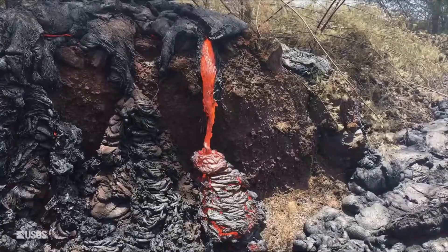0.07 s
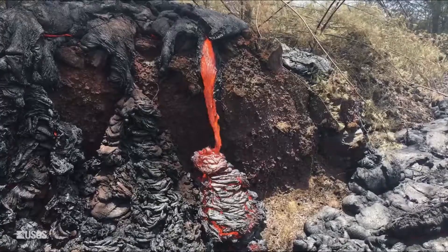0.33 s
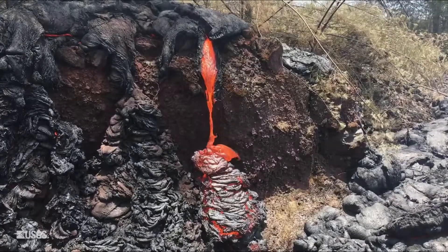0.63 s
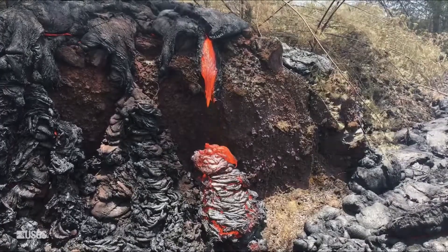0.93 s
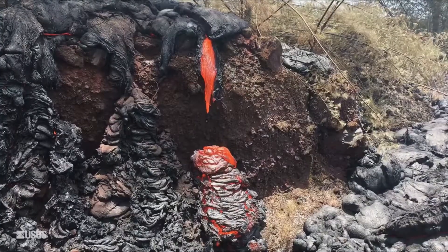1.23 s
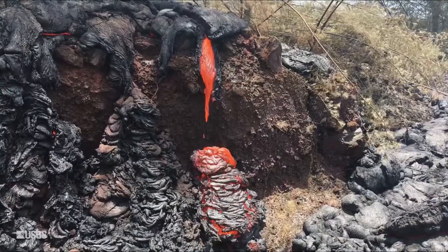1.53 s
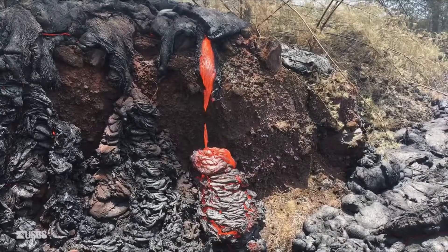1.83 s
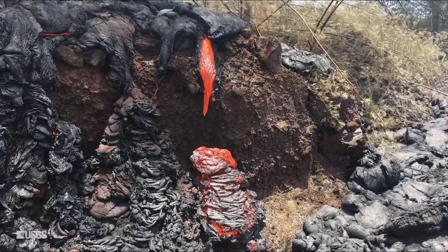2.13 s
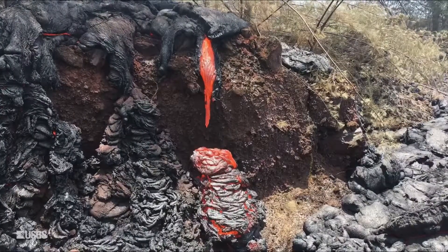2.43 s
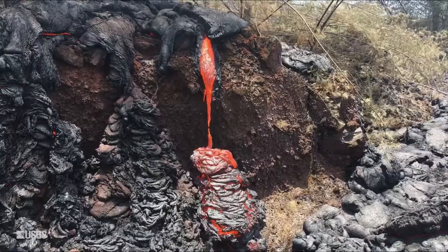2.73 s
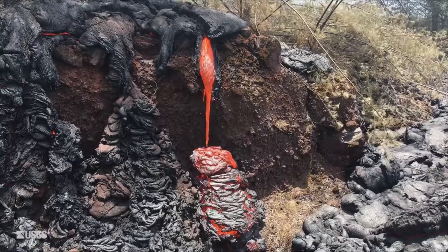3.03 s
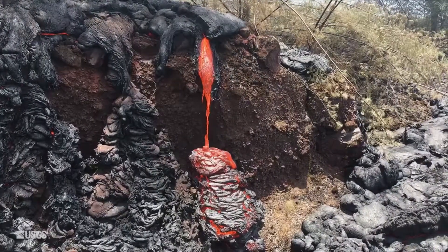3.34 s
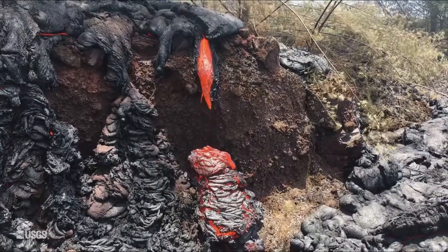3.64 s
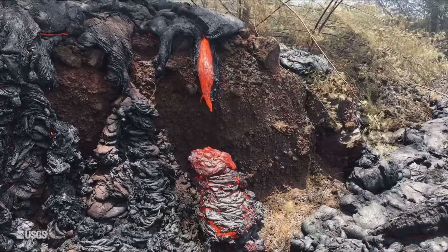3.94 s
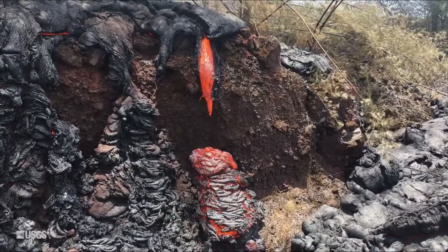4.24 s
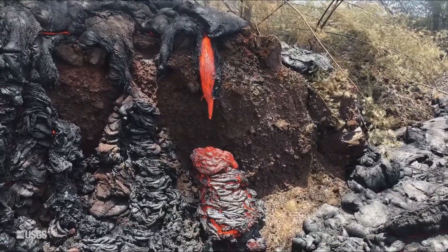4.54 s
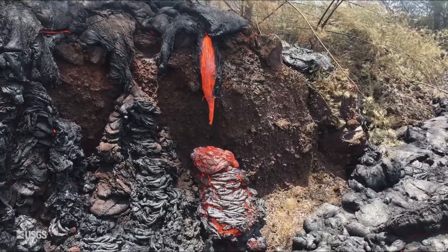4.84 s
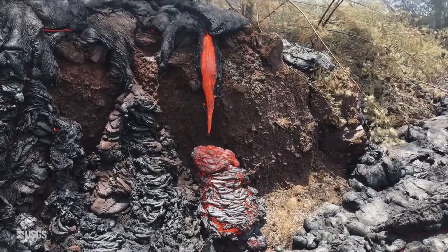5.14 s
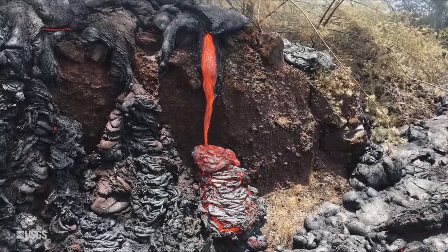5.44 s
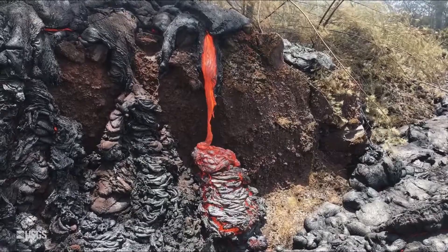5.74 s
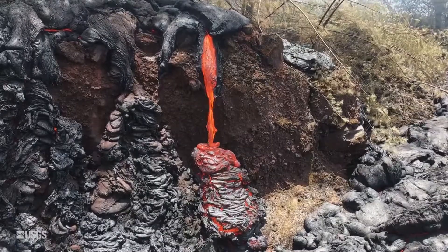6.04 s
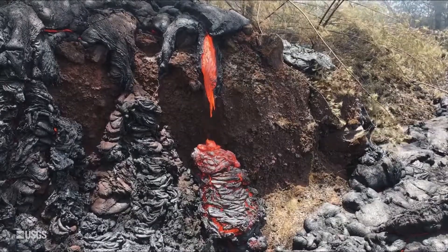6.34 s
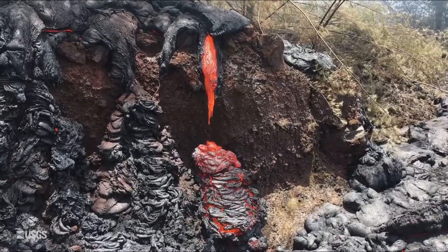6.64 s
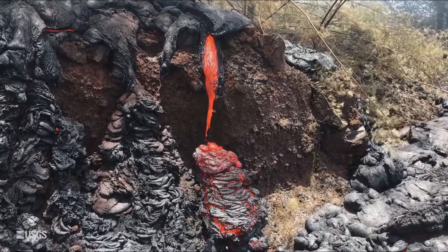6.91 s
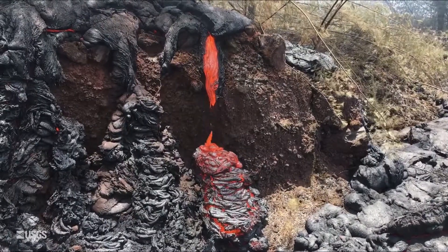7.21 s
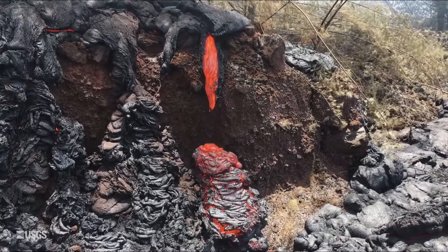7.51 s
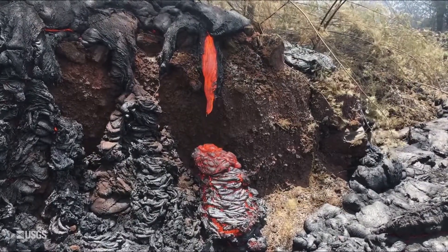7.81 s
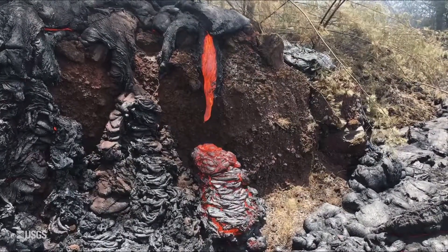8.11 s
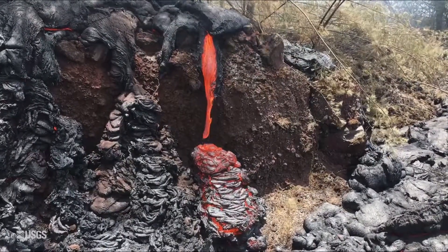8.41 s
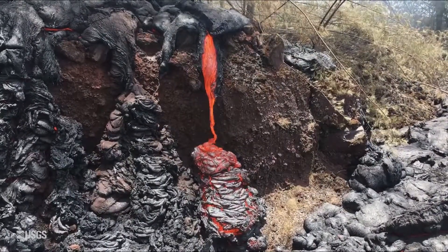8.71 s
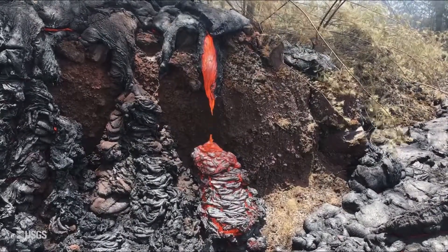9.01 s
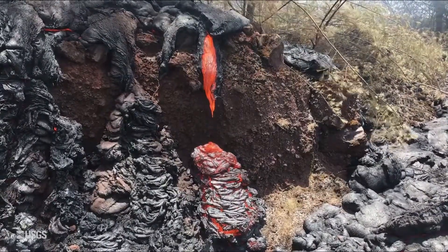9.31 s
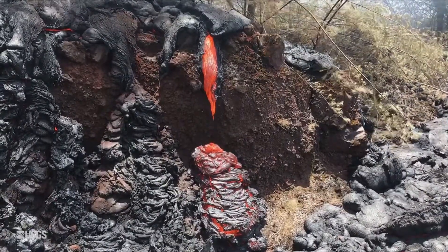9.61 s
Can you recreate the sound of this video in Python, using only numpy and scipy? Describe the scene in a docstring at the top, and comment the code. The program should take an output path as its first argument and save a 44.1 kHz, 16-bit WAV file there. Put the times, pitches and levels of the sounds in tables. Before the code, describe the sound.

Cooling lava ticks and crackles faintly over a low hiss, while wind rumbles and later buffets the microphone in hard gusts.

```python
"""Ticks, pops and flurries of tiny flakes come from the glassy crust of lava dribbling over a ledge.
The crust cracks as it cools, and each brittle fracture rings as a short damped oscillation.
Behind it lie a low steady hiss and a blurred chorus of far birds. Turbulent wind rumbles on the
microphone and in the second half buffets it in hard gusts."""
import sys
import numpy as np
from scipy import signal
from scipy.fft import rfft, irfft, next_fast_len
from scipy.io import wavfile
from scipy.ndimage import uniform_filter1d

SR = 44100
rng = np.random.default_rng(int(sys.argv[2]) if len(sys.argv) > 2 else 0)


def unload_audio(sound):
    """Save the sound as a 16-bit wav file, at the path given as the first command line argument."""
    columns = np.transpose(np.atleast_2d(sound))
    # keep every value between -1 and 1, then stretch to whole-number steps
    steps = np.round(np.clip(columns, -1, 1) * 32767)
    wavfile.write(sys.argv[1], SR, steps.astype(np.int16))


N = 426006
T = np.arange(N) / SR


def undb(db):
    """Amplitude ratio of a level in decibels."""
    return 10 ** (np.asarray(db) / 20)


def unit(x):
    """Normalisation to rms 1."""
    return x / np.sqrt(np.mean(x ** 2) + 1e-20)


def steady(x, samples):
    """Envelope flattening: division by the running rms."""
    return x / np.sqrt(uniform_filter1d(x ** 2, size=samples) + 1e-12)


def curve(rows, at):
    """Linear interpolation through (x, y) rows."""
    return np.interp(at, *np.transpose(rows))


def colour(x, spectrum):
    """Spectral shaping by (frequency_hz, level_db) rows, rolled off below the first; rms 1."""
    hz, db = np.transpose(spectrum)
    size = next_fast_len(N, True)
    bin_hz = np.fft.rfftfreq(size, 1 / SR) + 1e-9
    gain = undb(np.interp(np.log(bin_hz), np.log(hz), db)) * np.minimum(bin_hz / hz[0], 1) ** 2
    return unit(irfft(rfft(x, size) * gain, size)[:N])


def butterworth(x, kind, edge_hz, order=2):
    """Filtering with a maximally flat passband."""
    return signal.sosfilt(signal.butter(order, edge_hz, kind, fs=SR, output="sos"), x)


def noise_band(low_hz, high_hz):
    """Band-limited Gaussian noise; rms 1."""
    return unit(butterworth(rng.standard_normal(N), "band", [low_hz, high_hz], order=4))


def wander(rate_hz):
    """Random modulation: sample-and-hold noise, smoothed twice; rms 1."""
    hold = max(int(SR / rate_hz), 2)
    steps = np.repeat(rng.standard_normal(N // hold + 1), hold)
    return unit(uniform_filter1d(uniform_filter1d(steps, hold), hold)[:N])


def swell(middle_s, length_s, edge=2.32):
    """A generalised Gaussian envelope of peak 1; edge 2 is a bell, higher has steeper flanks."""
    near = slice(max(int((middle_s - 2 * length_s) * SR), 0), int((middle_s + 2 * length_s) * SR))
    out = np.zeros(N)
    out[near] = np.exp(-np.abs(2 * (T[near] - middle_s) / length_s) ** edge)
    return out


# Spectrum of the surroundings: frequency_hz, relative_db
HISS_SPECTRUM = [(100, 6.5), (400, -1.5), (650, 2), (1000, 5.5), (1400, -0.5), (2000, -6.5), (2700, -7.5),
                 (3500, 0), (4200, -8), (4900, -17.5), (6800, -11), (7800, -24.5), (9500, -15),
                 (16000, -45)]
def hiss(level_db=-54.5, sway_db=0.3):
    """Broadband ambient noise: a smooth distant rush of nearly constant level."""
    return colour(rng.standard_normal(N), HISS_SPECTRUM) * undb(level_db + sway_db * wander(3))


# Far calls that stand out of the chorus: start_s, end_s, first_hz, last_hz, relative_db
BIRD_CALLS = [(0.95, 1.25, 5650, 5600, -82), (2.4, 2.95, 4300, 3870, -65), (2.55, 2.85, 3340, 3320, -59.5),
              (3.3, 3.9, 3390, 3320, -61), (3.3, 3.75, 3880, 4020, -62.5), (3.85, 4.25, 4090, 4120, -62),
              (5.3, 5.55, 3920, 3900, -58), (5.4, 5.8, 3620, 3560, -62), (5.42, 5.6, 3160, 3100, -58),
              (5.55, 5.85, 4600, 4580, -66), (6.3, 6.6, 3780, 3980, -64), (6.75, 7.15, 3500, 3390, -61.5),
              (7.35, 7.8, 3930, 3770, -64.5), (8.65, 9.0, 3660, 3890, -56.5), (8.75, 9.0, 6850, 6980, -69),
              (9.35, 9.66, 3560, 3600, -62)]
def birds(blur_hz=130, chorus_db=-70, gain_db=-1.0, count=64):
    """Scattering in the forest smears far, wavering calls into gliding narrowband noise."""
    chorus = []
    for when, length, pitch, glide, nearness in rng.random((count, 5)):
        start_s = when * N / SR
        end_s = start_s + 0.165 + 0.286 * length
        first_hz = 3100 + 950 * pitch
        chorus.append((start_s, end_s, first_hz, first_hz + 200 * (glide - .5), chorus_db + 7 * nearness))
    blur = wander(blur_hz) + 1j * wander(blur_hz)
    waver = 1 + .011 * wander(14)
    out = np.zeros(N)
    for start_s, end_s, first_hz, last_hz, db in list(BIRD_CALLS) + chorus:
        span = np.arange(int(start_s * SR), min(int(end_s * SR), N))
        progress = np.linspace(0, 1, len(span))
        shifted = span - rng.integers(N)  # each call has its own stretch of blur and waver
        pitch_hz = (first_hz + (last_hz - first_hz) * progress) * waver[shifted]
        phase = 2 * np.pi * np.cumsum(pitch_hz) / SR
        call = np.real(blur[shifted] * np.exp(1j * phase))
        out[span] += undb(db + gain_db) * np.sin(np.pi * progress) * call
    return out


# Mean strength of the wind at the microphone: time_s, level_db
MEAN_FLOW = [(0.0, -73), (0.45, -80), (1.3, -76.5), (1.7, -58), (2.25, -72.5), (3.0, -65), (3.22, -56),
             (4.15, -59), (5.0, -47), (5.7, -71), (5.95, -38), (6.3, -56.5), (7.1, -48), (7.4, -32),
             (8.15, -32.5), (8.45, -37), (9.05, -37.5), (9.66, -37.5)]
# Gusts that swell above the mean: middle_s, length_s, level_db, extra_bass_db
GUSTS = [(1.007, 0.07, -51, 2.5), (1.97, 0.15, -60, 5.5), (3.172, 0.055, -48, 3.5), (3.603, 0.08, -58, 3.5),
         (3.956, 0.044, -51, 5.5), (4.061, 0.062, -59, 3.5), (4.28, 0.06, -50, 1),
         (4.968, 0.14, -47.5, 2.5), (5.933, 0.19, -34.5, -8.5), (6.456, 0.088, -33, 7),
         (6.582, 0.14, -25, -6), (7.415, 0.1, -24.5, 1), (7.71, 0.07, -29, 3.5), (7.897, 0.2, -15, -1),
         (8.02, 0.061, -18, -3), (8.577, 0.2, -39, 0.5), (8.966, 0.12, -32.5, 7), (9.102, 0.082, -34, 2.5),
         (9.288, 0.067, -37.5, 4.5)]
def wind_level(puffs_per_s=13, puff_db=3):
    """Incoherent addition: the mean flow, with its puffs and lulls, and the gusts sum in power; in dB."""
    breeze_power = undb(curve(MEAN_FLOW, T) + puff_db * wander(puffs_per_s)) ** 2
    gust_power = sum(undb(db) ** 2 * swell(middle_s, length_s) for middle_s, length_s, db, _ in GUSTS)
    return 10 * np.log10(breeze_power + gust_power)


# Single eddies that hit the microphone: middle_s, length_s, level_db, corner_ratio
EDDIES = [(0.846, 0.037, -47, 1.0), (1.072, 0.011, -31.5, 0.51), (1.61, 0.019, -40.5, 0.9),
          (1.643, 0.015, -40, 0.9), (2.449, 0.013, -37, 1.2), (3.16, 0.018, -38.5, 0.63),
          (3.809, 0.019, -37, 0.33), (5.816, 0.018, -33, 1.6), (5.968, 0.017, -21.5, 0.69),
          (6.017, 0.013, -26.5, 0.69), (6.208, 0.017, -28, 0.73), (6.387, 0.036, -33, 0.89),
          (6.432, 0.0078, -19, 0.43), (6.47, 0.025, -14, 0.93), (6.522, 0.0056, -13, 0.63),
          (6.596, 0.062, -19.5, 0.87), (6.682, 0.019, -21.5, 1.01), (6.858, 0.032, -28.5, 0.54),
          (7.302, 0.008, -23.5, 0.92), (7.399, 0.028, -13.0, 1.07), (7.498, 0.016, -24.5, 1.14),
          (7.634, 0.02, -21, 1.03), (7.701, 0.016, -20.5, 0.99), (7.742, 0.022, -17.5, 1.14),
          (7.806, 0.017, -14, 1.26), (7.846, 0.025, -16.5, 1.35), (7.902, 0.049, -16, 1.35),
          (8.05, 0.0059, -11.5, 2.02), (8.063, 0.017, -16.5, 1.4), (8.198, 0.029, -15, 1.11),
          (8.272, 0.021, -26.5, 0.54), (8.476, 0.03, -24.5, 0.48), (8.54, 0.01, -23.5, 0.76),
          (8.928, 0.019, -32, 1.4), (8.707, 0.015, -26, 0.78), (8.779, 0.016, -26.5, 0.67),
          (9.006, 0.024, -20.5, 0.94), (9.291, 0.0071, -21.5, 0.88), (9.509, 0.028, -29, 0.76)]
# Corner of the turbulence spectrum against the strength of the flow: flow_db, corner_hz
CORNER_BY_FLOW = [(-74, 177), (-29.5, 324), (-30.5, 400), (-21, 627), (-15.5, 976), (15, 640)]
# Turbulence spectrum around that corner: ratio_to_corner, relative_band_db
BUFFET_SPECTRUM = [(.1, -32), (.2, -11.5), (.32, -6), (.5, -5.5), (.75, -7), (1.001, -9.5), (1.5, -15.5),
                   (2.7, -28), (4, -50.5), (6, -77)]
def buffeting(wind_db, flutter_db=3.0, churn_db=1.0, tear_db=4.5, gain_db=1.0):
    """Turbulence at the microphone port: harder flow makes smaller, faster eddies and a brighter noise."""
    # light air comes fitfully, a full blast more evenly
    depth_db = np.interp(wind_db, [-30, -20], [flutter_db, churn_db])
    power = undb(wind_db + depth_db * wander(70)) ** 2
    weighted_power = power.copy()
    for middle_s, length_s, db, corner_ratio in EDDIES:
        eddy_power = undb(db) ** 2 * swell(middle_s, length_s, edge=3.0)
        power += eddy_power
        weighted_power += corner_ratio * eddy_power
    flow_db = 10 * np.log10(power)
    corner_hz = curve(CORNER_BY_FLOW, flow_db) * weighted_power / power
    ratios, shape_db = np.transpose(BUFFET_SPECTRUM)
    turbulence = np.zeros(N)
    for hz in 170 * 2 ** (np.arange(11) / 2):  # half-octave bands
        band_db = np.interp(np.log(hz / corner_hz), np.log(ratios), shape_db)
        turbulence += undb(band_db) * noise_band(hz / 2 ** .25, hz * 2 ** .25)
    tearing = undb(tear_db * wander(500))  # the flow leaves the port in millisecond bursts
    return steady(turbulence * tearing, samples=1100) * undb(flow_db + gain_db)


# Spectrum of the pressure on the housing: frequency_hz, relative_db
RUMBLE_SPECTRUM = [(20, -26), (32, -19.5), (48, -0.5), (80, -0.5), (120, -5.5), (170, -21.5), (240, -28.5),
                   (400, -74.5)]
# The rumble grows with the wind, then levels off and eases in the hardest gusts: flow_db, rumble_db
RUMBLE_BY_FLOW = [(-79, -55.5), (-64.5, -43.5), (-44.5, -31.5), (-39.5, -26.5), (-32.5, -25.5),
                  (-24.5, -27), (-8, -33.5)]
def rumble(wind_db, throb_db=2.5, wake_s=0.048, wake_db=-3.5, upper_db=-12.0, upper_growth=0.45):
    """Pressure fluctuation: large slow eddies push on the housing; the upper band grows fastest."""
    # each eddy's energy is spread over the length of its wake
    wake_power = sum(undb(db + wake_db) ** 2 * length_s / wake_s * swell(middle_s, wake_s)
                     for middle_s, length_s, db, _ in EDDIES)
    flow_db = 10 * np.log10(undb(wind_db) ** 2 + wake_power)
    level_db = curve(RUMBLE_BY_FLOW, flow_db) + throb_db * wander(35)
    level_db += sum(bass_db * swell(middle_s, length_s) for middle_s, length_s, _, bass_db in GUSTS)
    deep = colour(rng.standard_normal(N), RUMBLE_SPECTRUM)
    upper = noise_band(110.2, 198.4) * undb(upper_db + upper_growth * (level_db - np.median(level_db)))
    return steady(deep + upper, samples=3000) * undb(level_db)


# Strands of lava that stretch and settle on the heap: middle_s, length_s, level_db
DRIPS = [(0.4, 0.75, -55), (1.6, 0.82, -64), (3.25, 0.32, -61), (5.7, 0.94, -58), (6.28, 0.18, -53.5),
         (7.12, 0.49, -61.5), (8.75, 0.98, -63)]
def flaking_level(rest_db=-61.5, cooling_db_per_s=-0.18):
    """Strain sheds flakes: their level, in dB, eases as the crust cools and rises with each drip."""
    rest_power = undb(rest_db + cooling_db_per_s * T) ** 2
    drip_power = sum(undb(db) ** 2 * swell(middle_s, length_s, edge=3.7) for middle_s, length_s, db in DRIPS)
    return 10 * np.log10(rest_power + drip_power)


# Spectrum of the flakes: frequency_hz, relative_db
FLAKE_SPECTRUM = [(1180, -37), (2000, -1), (2960, 1.5), (4380, 0.5), (5030, -1.5), (6040, 3.5), (7980, 0),
                  (10500, 2), (11700, 4), (14500, 2.5), (16000, 5)]
# Small showers of flakes: start_s, half_fade_s, relative_db
FLURRIES = [(0.173, 0.047, -48), (0.27, 0.071, -52), (0.622, 0.13, -48), (0.803, 0.016, -44.5),
            (1.944, 0.039, -48.5), (2.767, 0.04, -53.5), (3.348, 0.088, -50.5), (3.598, 0.027, -52.5),
            (5.738, 0.23, -52), (6.092, 0.11, -42), (7.197, 0.1, -54)]
def flakes(flaking_db, bands=9, per_band_per_s=1600, size_spread_db=4.5, clump_db=2.5):
    """Shot noise: countless tiny flakes spring off the crust, in clumps and now and then in a shower."""
    edges_hz = np.geomspace(1500, 17000, bands + 1)
    fizz = np.zeros(N)
    for low_hz, high_hz in zip(edges_hz, edges_hz[1:]):
        breaks = rng.random(N) < per_band_per_s / SR
        impulses = breaks * rng.standard_normal(N) * undb(size_spread_db * rng.standard_normal(N))
        fizz += butterworth(impulses, "band", [low_hz, high_hz])
    strength = undb(flaking_db)
    for start_s, half_fade_s, db in FLURRIES:
        fade = np.interp(T, [start_s, start_s + 2 * half_fade_s], [1.2, 0], left=0)
        strength = np.maximum(strength, undb(db) * fade)
    clumps = undb(clump_db * wander(220))
    return colour(fizz * clumps, FLAKE_SPECTRUM) * strength


SNAP_SAMPLES = 256
def snap(pitch_hz, decay_cycles, highest_hz=15000):
    """Damped oscillation: a fragment rings, falling to 1/e in decay_cycles periods."""
    cycles = min(pitch_hz, highest_hz) * np.arange(SNAP_SAMPLES) / SR
    return np.sin(2 * np.pi * cycles) * np.exp(-cycles / decay_cycles)


def crackle(flaking_db, gain_db=11.0, spread_db=6.0, decay_cycles=2.5, count=480):
    """Acoustic emission: small cracks at random times and pitches, stronger while lava drips."""
    out = np.zeros(N + SNAP_SAMPLES)
    for when, pitch, rank, ring in rng.random((count, 4)):
        start = int(when * N)
        rarity = -np.log(.1 + rank)  # strong cracks are the rare ones
        db = flaking_db[start] + gain_db + spread_db * rarity
        pitch_hz = 5000 + 10000 * np.sqrt(pitch)
        out[start:start + SNAP_SAMPLES] += undb(db) * snap(pitch_hz, decay_cycles * (.5 + ring))
    return butterworth(out[:N], "high", 2000)


def cracks(rows, decay_cycles, gain_db, splinter_db, splinter_s, low_cut_hz, samples=1400):
    """Brittle fracture: one sharp snap, then a decaying train of splinters and reflections off rock."""
    out = np.zeros(N + 2 * samples)
    age_s = np.arange(samples) / SR
    for start_s, db, pitch_hz in rows:
        impulses = undb(splinter_db) * rng.standard_normal(samples) ** 3 * np.exp(-age_s / splinter_s)
        impulses[0] = 1  # the fracture itself
        crack = np.convolve(impulses, snap(pitch_hz, decay_cycles))[:samples]
        start = int(start_s * SR)
        out[start:start + samples] += undb(db + gain_db) * crack / np.abs(crack).max()
    return butterworth(out[:N], "high", low_cut_hz)


# Fractures of thicker crust: start_s, relative_db, pitch_hz
CRUST_POPS = [(0.2776, -46.5, 2240), (0.6136, -43, 2950), (0.64, -46, 2400), (0.661, -39.5, 3270),
              (0.72, -45.5, 2600), (1.294, -47, 3180), (1.433, -44, 1390), (1.5112, -46, 1280),
              (1.7744, -44.5, 3040), (1.9849, -45, 3930), (2.13, -51, 3130), (3.0944, -46, 3300),
              (3.5583, -48.5, 1280), (3.6237, -45, 1240), (4.9733, -43, 2280), (5.7895, -43, 3460),
              (6.316, -42, 1190)]
def pops():
    """Heavy damping: thicker crust breaks with a dull pop that dies in about a cycle."""
    return cracks(CRUST_POPS, decay_cycles=0.53, gain_db=10.5,
                  splinter_db=-30.5, splinter_s=0.0049, low_cut_hz=900)


# Fractures of the glassy crust: start_s, relative_db, pitch_hz (capped by snap)
CRUST_TICKS = [(0.2718, -34, 9150), (0.447, -26.5, 7600), (0.5007, -31.5, 5700), (0.802, -27, 9000),
               (0.985, -23, 12200), (1.0465, -27, 15400), (1.3718, -28.5, 8550), (1.5956, -25, 12300),
               (2.2247, -35.5, 5500), (2.5736, -32.5, 9900), (2.7821, -35, 8990), (2.9554, -23, 14200),
               (3.348, -25, 11500), (3.6046, -25, 14700), (3.6591, -29, 10200), (4.0263, -31, 13400),
               (4.14, -31, 15300), (4.4742, -22, 15100), (4.54, -27.5, 12100), (4.6753, -22, 15400),
               (4.75, -36, 6000), (4.819, -28, 10100), (5.035, -31.5, 12000), (5.0594, -35.5, 6500),
               (5.32, -24, 15600), (5.3921, -23, 15000), (5.5732, -22.5, 13200), (5.7383, -28, 12100),
               (5.917, -31.5, 6230), (5.9384, -28, 14700), (6.043, -31, 10000), (6.0646, -27, 9650),
               (6.0952, -15.5, 11900), (6.1015, -28, 8980), (6.1225, -28, 14000), (6.2948, -24.5, 9500),
               (6.4403, -33, 6160), (6.626, -35, 9350), (6.714, -32, 7240), (6.9394, -21.5, 6940),
               (7.243, -21, 15600), (7.404, -26, 10100), (7.634, -33.5, 9520), (8.0087, -32, 12500),
               (8.3599, -29, 14100), (8.692, -29.5, 9260), (8.9723, -19.5, 11000), (9.1361, -33.5, 9750),
               (9.41, -35, 12800), (9.5985, -28.5, 11500)]
def ticks():
    """Thermal stress: the cooling glassy crust cracks with short, bright ticks."""
    return cracks(CRUST_TICKS, decay_cycles=1.3, gain_db=-1.5,
                  splinter_db=-29, splinter_s=0.0029, low_cut_hz=2510)


def scene():
    """Superposition of crust, surroundings and wind at one microphone."""
    wind_db, flaking_db = wind_level(), flaking_level()
    crust = ticks() + pops() + flakes(flaking_db) + crackle(flaking_db)
    surroundings = hiss() + birds()
    wind = rumble(wind_db) + buffeting(wind_db)
    return (crust + surroundings + wind)[None]


def record(dry, top_hz=15750):
    """Soft saturation rounds the highest peaks, and a steep low-pass cuts the top."""
    low_pass = signal.ellip(10, .2, 70, top_hz, fs=SR, output="sos")
    return signal.sosfilt(low_pass, np.tanh(dry))


dry = scene()
out = record(dry)
unload_audio(out)
```